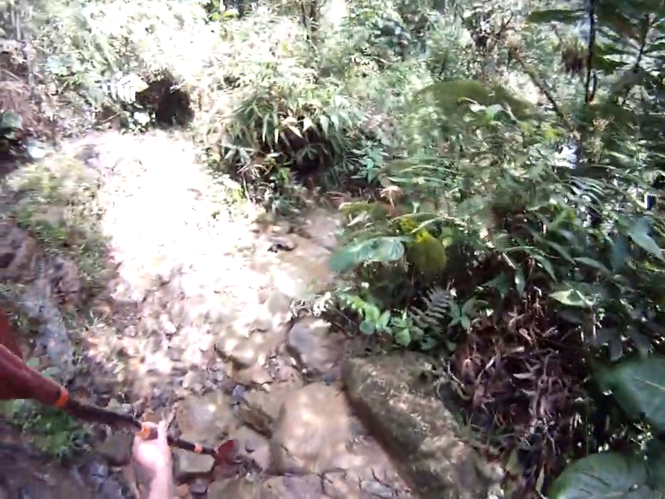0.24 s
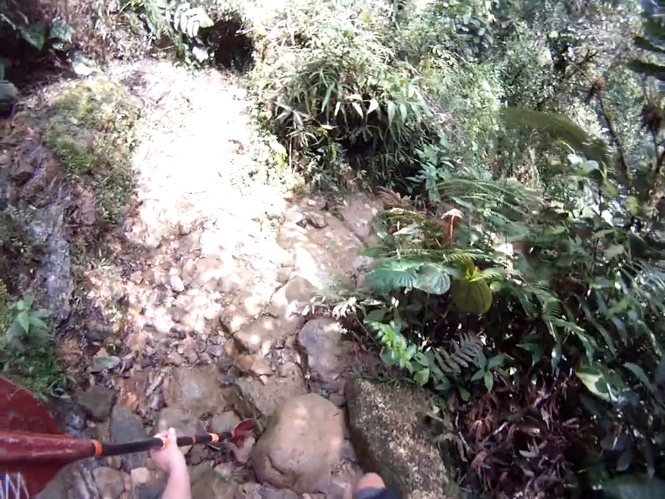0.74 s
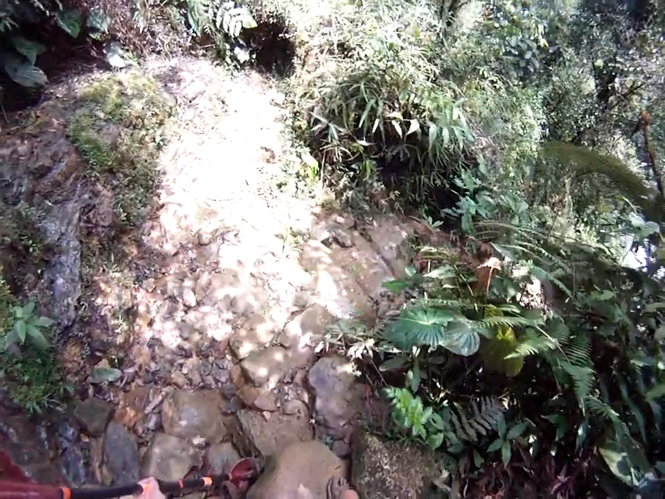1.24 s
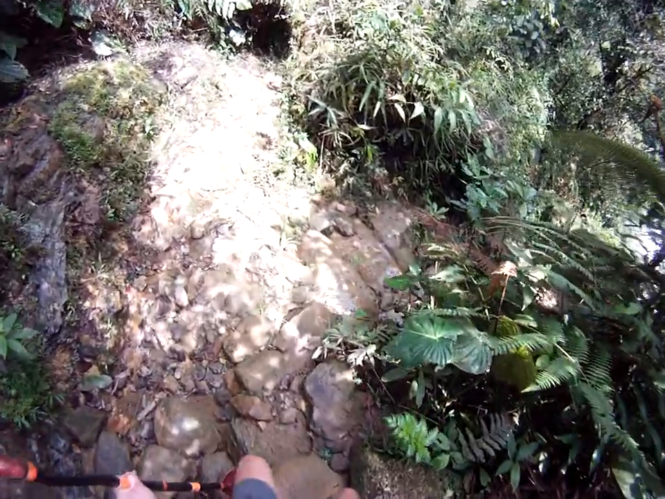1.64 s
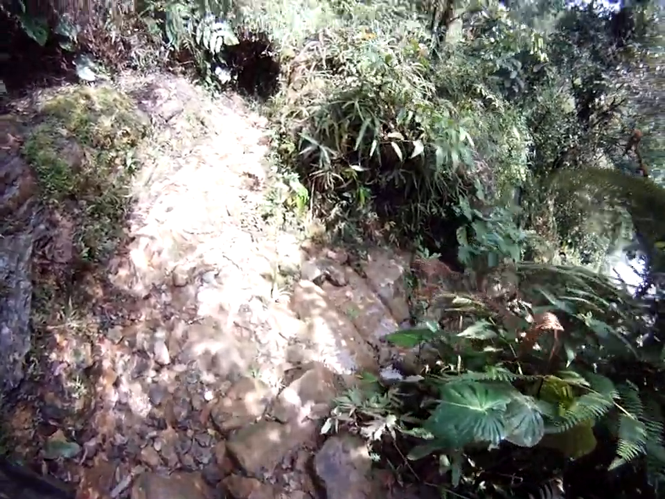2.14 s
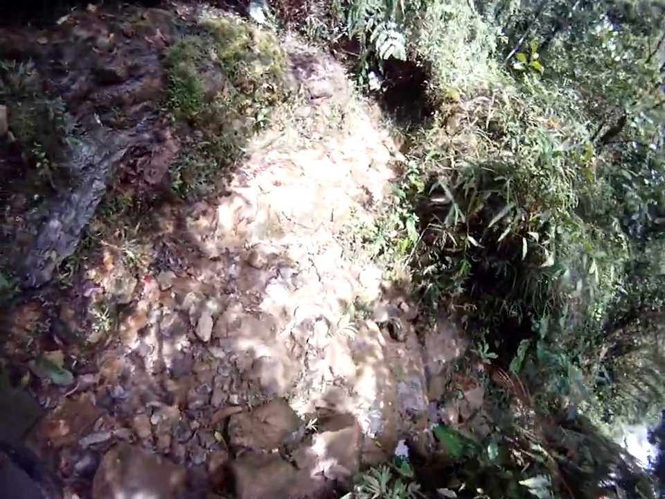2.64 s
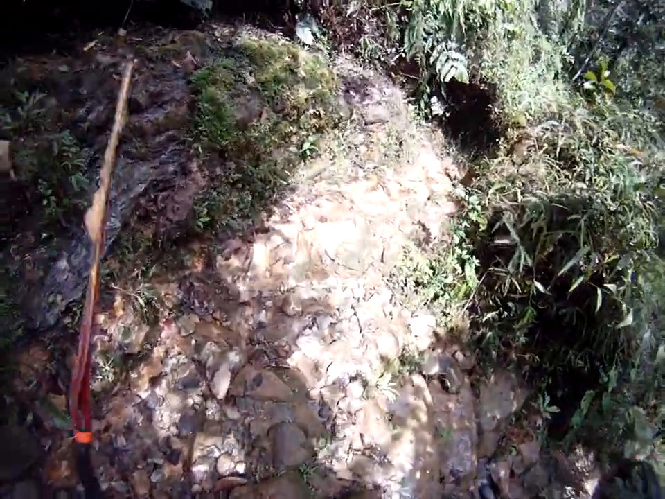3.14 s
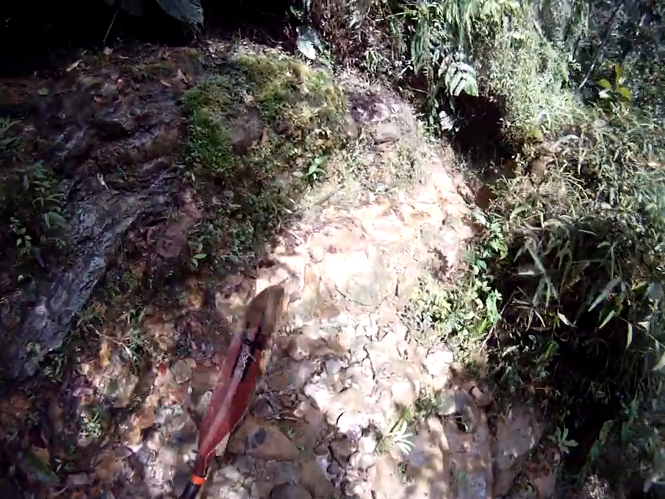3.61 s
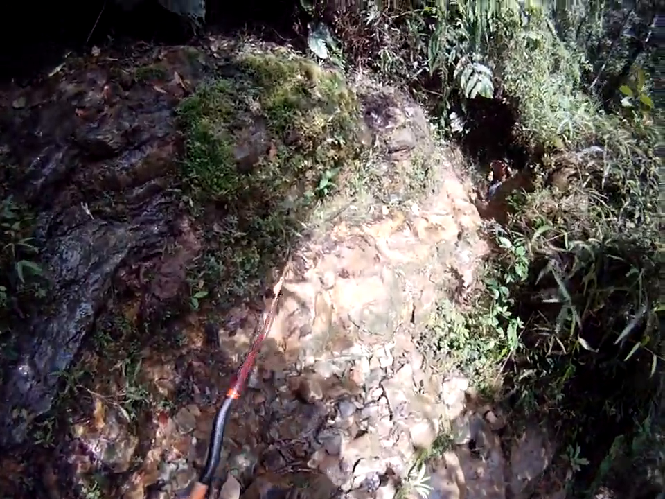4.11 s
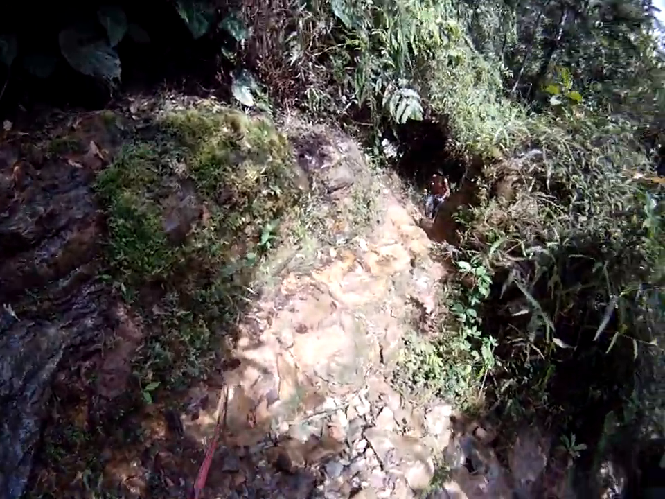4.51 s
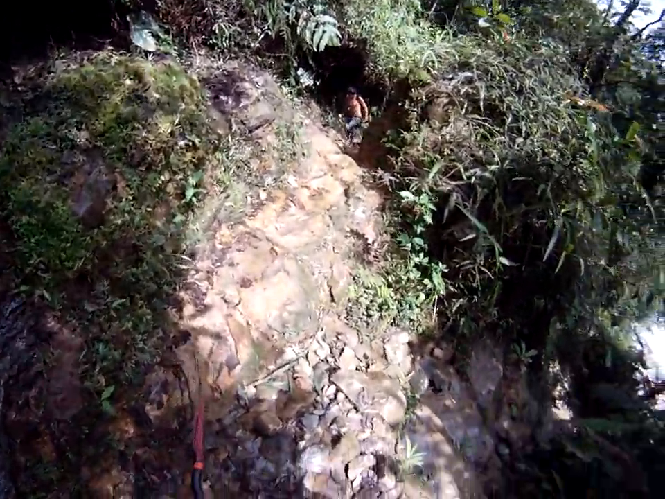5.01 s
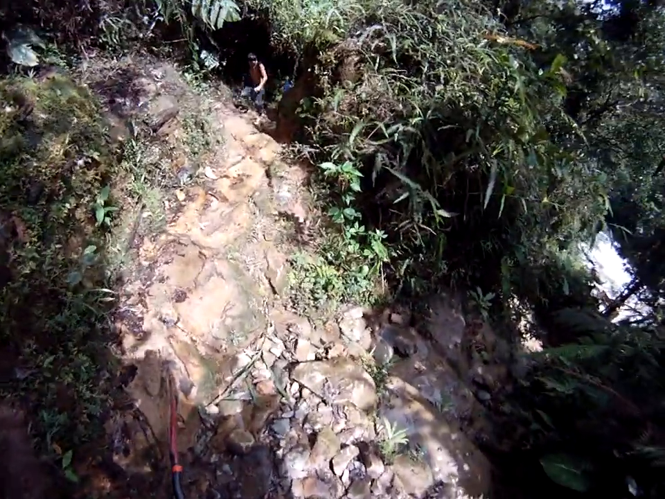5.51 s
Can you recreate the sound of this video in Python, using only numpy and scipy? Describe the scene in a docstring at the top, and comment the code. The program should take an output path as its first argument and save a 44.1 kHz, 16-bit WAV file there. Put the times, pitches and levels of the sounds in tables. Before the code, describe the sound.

A quiet, steady, slightly coloured forest hiss runs for about six seconds, close and dry in mono, with a faint low rumble from the hand gripping the device. A barely felt bump comes at 0.4 s, and a small stony click with a soft low thump at 1.1 s. After a faint dull knock at 2.2, the loudest event lands at 2.3 s: a sharp, hard crack of the stick on rock with a deep, sub-heavy jolt that rebounds slower and softer. Tiny clicks follow at 2.4, 2.65 and 2.9. At 3.1 a second, weaker thump brings bright pebble clicks and gritty crunch; dull woody knocks and short scrapes come around 3.3 to 3.4. The middle of the hiss is slightly fuller from about 2.5 to 5. Low soft bumps at 3.6 to 3.8, muffled palm rubbing near 4.3, then faint bumps and one tiny click at 5.35.

```python
"""Rocky trail: a hiker climbs, camera in one hand and stick in the other.
Steps jolt the camera: deep thumps, sines in bell-shaped swells, rebound slower and softer.
The stick clicks: noisy forces drive modes of stone, shaft and tip. Random impulses, coloured and
ringing, make short bursts: dull knocks, a step's crunch and scrapes.
The grip rumbles softly, the palm rubs, and forest hiss comes through the housing: coloured noise."""
import sys
import numpy as np
from scipy.fft import rfft, irfft, next_fast_len
from scipy.io import wavfile
from scipy.ndimage import map_coordinates

SR = 44100
rng = np.random.default_rng(int(sys.argv[2]) if len(sys.argv) > 2 else 0)


def wav_record(signal):
    """Record a signal, one row per channel, as 16-bit PCM in the file named by sys.argv[1]."""
    frames = np.transpose(np.atleast_2d(signal))
    bounded = np.clip(frames, -1, 1)
    # unit amplitude maps onto the largest positive 16-bit level
    quanta = np.round(bounded * 32767).astype(np.int16)
    wavfile.write(sys.argv[1], SR, quanta)


N = 253795
TIME = np.arange(N) / SR

# steps felt through the arm: centre_s, level_db, sway_hz, half_length_s
STEPS = [(.39, -43, 24, .018), (1.122, -34, 28, .022), (2.3258, -10.5, 35, .013), (3.0845, -20.5, 24, .012),
         (3.626, -35, 28, .018), (3.772, -34, 17, .025), (4.52, -41, 50, .013), (5.02, -45, 82, .016),
         (5.45, -40.5, 24, .05)]
HARDEST_DB = max(row[1] for row in STEPS)


def amp(db):
    """Amplitude ratio of a level in dB."""
    return 10 ** (np.asarray(db) / 20)


def unit(x):
    """x scaled to rms 1."""
    return x / np.sqrt(np.mean(x ** 2) + 1e-20)


def along(points, hz):
    """Interpolate (Hz, value) points on a log frequency axis."""
    point_hz, value = np.transpose(points)
    return np.interp(np.log(hz + 1), np.log(point_hz), value)


def filtered(x, response):
    """x through a complex response of frequency; zero padding leaves room for the ringing."""
    size = next_fast_len(len(x) + 8192)
    spectrum = rfft(x, size) * response(np.fft.rfftfreq(size, 1 / SR))
    return irfft(spectrum, size)[:len(x)]


def noise(colour):
    """Gaussian noise of rms 1 with a (Hz, dB) colour."""
    return unit(filtered(rng.standard_normal(N), lambda f: amp(along(colour, f))))


def ring(modes, f):
    """Causal response of (Hz, width Hz, dB) resonances, alternating in sign."""
    total = 0
    for k, (hz, width_hz, db) in enumerate(modes):
        resonance = 1j * f * width_hz / (hz * hz - f * f + 1j * f * width_hz)
        total = total + (-1) ** k * amp(db) * resonance
    return total


def add(track, start_s, sound):
    """Mix a sound into the track at start_s."""
    part = track[round(start_s * SR):][:len(sound)]
    part += sound[:len(part)]


def swell(full_s, db, rise_s, hold_s, fall_s):
    """Gain that rises to its level by full_s, holds and falls, with Gaussian flanks."""
    early_s = np.maximum(full_s - TIME, 0)
    late_s = np.maximum(TIME - full_s - hold_s, 0)
    return amp(db) * np.exp(-(early_s / rise_s) ** 2 - (late_s / fall_s) ** 2)


def thumps(rows):
    """Soft blows: each pushes, then pulls back, as a sine in a bell-shaped swell centred on its time."""
    out = np.zeros(N)
    for centre_s, db, hz, half_length_s in rows:
        t = TIME - centre_s
        out -= amp(db) * np.exp(-(t / half_length_s) ** 2) * np.sin(2 * np.pi * hz * t)
    return out


def steps(rebounds=2):
    """Each step jolts the arm, which springs back ever slower and softer; hard steps also thud at the heel."""
    rebound_cycles, slowing = 1.55, .6  # wait in sway cycles; sway rate over the one before
    rebound_db, settle_db = -11.5, -9  # first loss, each further loss
    heel_hz, heel_half_length_s = 72, .011
    heel_db, heel_db_per_step_db = -20, 2.3  # level in the hardest step
    blows = []
    for centre_s, db, hz, half_length_s in STEPS:
        blows.append((centre_s, db, hz, half_length_s))
        level_db = heel_db + heel_db_per_step_db * (db - HARDEST_DB)
        blows.append((centre_s, level_db, heel_hz, heel_half_length_s))
        for k in range(rebounds):
            rate = slowing ** k
            centre_s = centre_s + rebound_cycles / (hz * rate)
            blows.append((centre_s, db + rebound_db + k * settle_db, hz * rate, half_length_s / rate))
    return thumps(blows)


def bumps():
    """Short, higher bumps, some within the hard step: sines in bell-shaped swells."""
    # centre_s, level_db, pitch_hz, half_length_s
    bump_rows = [(2.33, -42.5, 162, 0.0084), (2.334, -48, 262, 0.011), (2.375, -52.5, 295, 0.015),
                 (2.558, -47, 249, .014), (2.873, -51, 285, .011)]
    return thumps(bump_rows)


def taps(grit=0.125, contact_hz=9500):
    """The tip lands and crushes grit; the stone clinks and the shaft knocks."""
    # stick on stone: start_s, level_db, stone, shaft_knock_db, grit_t60_s
    blows = [(1.106, -43, "pebble", -1, .026), (2.3108, -35, "rock", 3, .027),
             (2.3149, -16.6, "rock", -1.2, .016), (2.391, -33.5, "pebble", -6, .026),
             (2.645, -43, "pebble", -11, .024), (2.915, -42, "rock", -1, .019),
             (3.087, -36.5, "rock", -4, .02), (3.1183, -28, "pebble", -13, .007),
             (3.127, -39.5, "pebble", -5, .075), (3.3492, -37, "rock", 8, .013),
             (5.345, -44, "pebble", -15, .012)]
    # modes of each kind of stone: mode_hz, width_hz, level_db
    stones = {"rock": [(3400, 700, -4), (4700, 900, -.5), (7600, 1100, -.8)], "pebble": [(3270, 520, 0),
              (8750, 600, 0)]}
    # modes of shaft and tip: mode_hz, width_hz, level_db
    shaft = [(412, 470, -4.5), (820, 580, -1.5), (1270, 560, 4), (1840, 400, 3), (12000, 3700, -10)]
    # softening by the blunt tip: frequency_hz, gain_db
    tip = [(2000, 0.5), (4500, -1), (8600, -3.5), (9500, -9), (10500, -4), (14000, -7), (15500, -15)]
    out, t = np.zeros(N), np.arange(SR // 10) / SR
    landing = np.exp(-2 * np.pi * contact_hz * t)  # brief push, rounder than the grit's crackle
    landing /= landing.sum()
    for s, db, stone, knock_db, t60_s in blows:
        crackle = rng.standard_normal(len(t)) * np.exp(-np.log(1000) * t / t60_s)
        force = landing + grit * crackle

        def body(f):
            modes = ring(stones[stone], f) + amp(knock_db) * ring(shaft, f)
            return modes * amp(along(tip, f))

        click = filtered(force, body)
        add(out, s, amp(db) * click / np.abs(click).max())
    return out


def noisy_bursts(impulses_per_s=4000):
    """Dull knocks, a step's crunch and scrapes: random impulses, coloured, with thin tones ringing within."""
    # short noisy bursts: start_s, length_s, rasp_db, tone_db
    bursts = [(2.2118, .007, -43.3, -60), (2.329, .009, -42, -60), (3.089, .08, -55.5, -64),
              (3.2885, .03, -46.5, -48), (3.297, .014, -52, -46.5), (3.351, .015, -48, -52),
              (3.362, .021, -44, -49)]
    # broad colour of the rasp: frequency_hz, level_db
    rasp_colour = [(100, -20), (500, -4.5), (1250, 2), (2000, -12), (2800, -17), (5000, -22), (10000, -24),
                   (15000, -22)]
    # thin ringing tones at fixed pitches: tone_hz, width_hz, level_db
    tones = [(900, 130, 1), (2090, 90, 9), (3900, 180, -2), (8100, 200, -17), (10000, 110, 1),
             (14150, 67, -3)]
    out, t = np.zeros(N), np.arange(SR // 10) / SR
    onset = 1 - np.exp(-t / .002)
    for s, length_s, rasp_db, tone_db in bursts:
        envelope = onset * np.exp(-(t / length_s) ** 2)
        impulses = rng.standard_normal(len(t)) * (rng.random(len(t)) < impulses_per_s / SR)
        rasp = unit(filtered(impulses, lambda f: amp(along(rasp_colour, f))))
        ringing = unit(filtered(impulses, lambda f: ring(tones, f)))
        add(out, s, envelope * (amp(rasp_db) * rasp + amp(tone_db) * ringing))
    return out


def handling():
    """The camera rumbles, more around each step and as the stick swings; the palm rubs on its housing."""
    # grip rumble: frequency_hz, level_db
    rumble = [(5, 2), (14, -12), (26, .5), (50, -16.5), (90, -17), (160, -40), (400, -85)]
    # palm rubbing: frequency_hz, level_db
    palm = [(30, 0), (65, 5), (115, 8.5), (160, -13.5), (270, -4), (420, -18), (900, -41.5)]
    # arm swings the stick forward: full_s (level reached), rumble_db, rise_s, hold_s, fall_s
    swing = (3.07, -43.5, .14, .72, .1)
    # palm shifts: full_s (level reached), rubbing_db, rise_s, hold_s, fall_s
    rub = (4.27, -46.5, .1, .12, .04)
    hold_db = -52  # rumble at rest
    shake_db, shake_db_per_step_db = -39.5, .6  # rumble at the hardest step
    shake_rise_s, shake_fall_s = .12, .12
    shake_rub_db = -14  # palm rubbing relative to the shake's rumble
    shakes = []
    for centre_s, db, *_ in STEPS:
        level_db = shake_db + shake_db_per_step_db * (db - HARDEST_DB)
        shakes.append(swell(centre_s, level_db, shake_rise_s, 0, shake_fall_s))
    shake = np.max(shakes, axis=0)
    motion = np.sqrt(amp(hold_db) ** 2 + swell(*swing) ** 2 + shake ** 2)
    rubbing = swell(*rub) + amp(shake_rub_db) * shake
    return motion * noise(rumble) + rubbing * noise(palm)


def forest(drift_db=.2, drift_per_s=2.5, air_db=-54.4):
    """Gently drifting hiss, lifted at housing resonances; its middle swells as the camera turns."""
    # forest air: frequency_hz, density_db (per Hz)
    hiss_colour = [(150.0, -1.1), (280.0, 0.0), (550.0, -4.2), (1200.0, -5.2), (2000.0, -7.1),
                   (2450.0, -12.9), (3500.0, -13.1), (4800.0, -15.2), (7200.0, -16.7), (9500.0, -24.6),
                   (11500.0, -22.2), (15000.0, -24.9)]
    # housing resonances: centre_hz, width_hz, lift_db
    housing = [(772, 133, 3.9), (907, 76, 5.6), (1626, 304, 5.5), (2129, 203, 9.7), (2673, 188, 8.4),
               (3199, 364, 7.8), (3899, 94, 2.9), (4913, 382, 3.0), (8106, 99, 3.0), (8791, 425, 8.7),
               (9332, 199, 9.0), (9876, 243, 12.1), (10359, 367, 8.0), (11120, 141, 4.1), (12877, 156, 4.3),
               (13639, 341, 6.5), (14113, 209, 10.2), (14688, 182, 6.7), (15138, 233, 7.7)]
    # camera turns along the trail: full_s (level reached), level_db, rise_s, hold_s, fall_s
    turn = (2.9, -62.5, .5, 1.3, 1.8)
    # middle of the hiss: frequency_hz, level_db
    middle = [(300, -20), (750, -1), (1150, 0), (1600, -8), (3500, -11), (6000, -30)]

    def lift(f):
        return amp(sum(db * np.exp(-2 * ((f - hz) / width_hz) ** 2) for hz, width_hz, db in housing))

    air = amp(air_db) * unit(filtered(noise(hiss_colour), lift))
    hiss = air + swell(*turn) * noise(middle)
    drift_points = rng.standard_normal(int(TIME[-1] * drift_per_s) + 4)
    drift = map_coordinates(drift_points, [TIME * drift_per_s])  # smooth cubic curve
    return amp(drift_db * drift) * hiss


def scene():
    """Steps, bumps, stick, noisy bursts, handling and forest, all at one microphone."""
    return (steps() + bumps() + taps() + noisy_bursts() + handling() + forest())[None]


def record(dry):
    """The microphone has two narrow deaf spots and a band limit."""
    # deaf spots: centre_hz, width_hz, depth_db
    notches = [(6030, 900, 19), (11990, 650, 18.5)]
    top_hz = 15330

    def response(f):
        loss_db = sum(db / (1 + (2 * (f - hz) / width_hz) ** 2) for hz, width_hz, db in notches)
        return amp(-loss_db) * (f < top_hz)

    return filtered(dry[0], response)[None]


dry = scene()
out = record(dry)
wav_record(out)
```